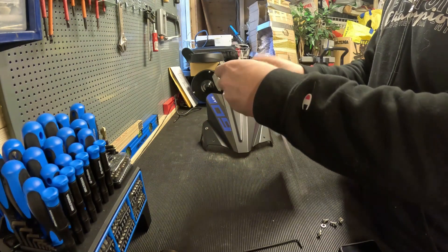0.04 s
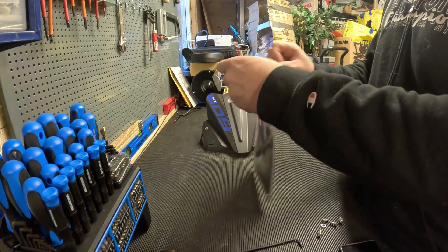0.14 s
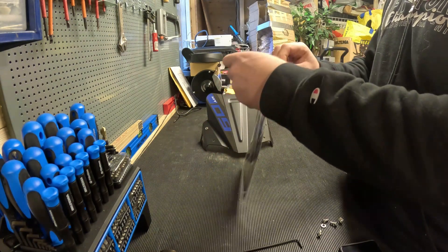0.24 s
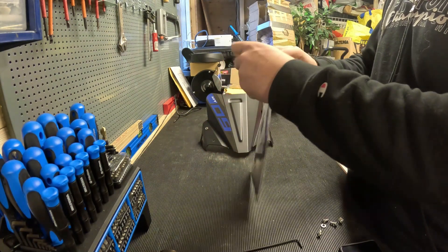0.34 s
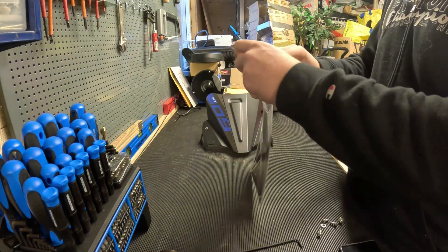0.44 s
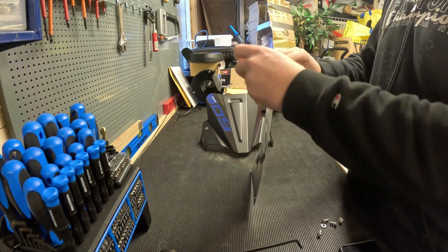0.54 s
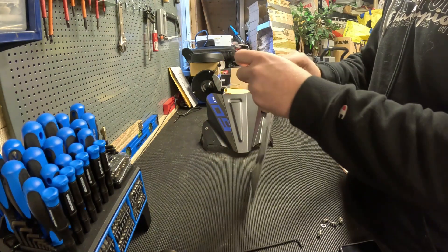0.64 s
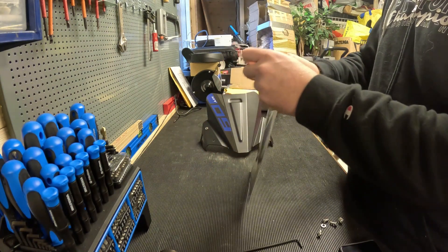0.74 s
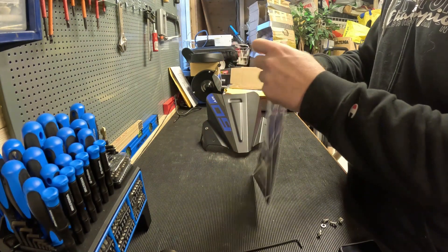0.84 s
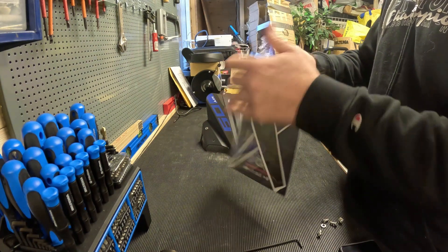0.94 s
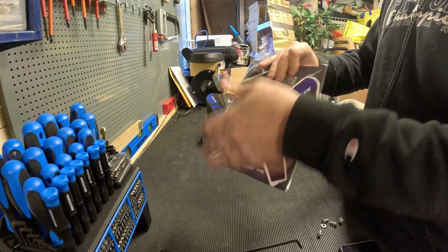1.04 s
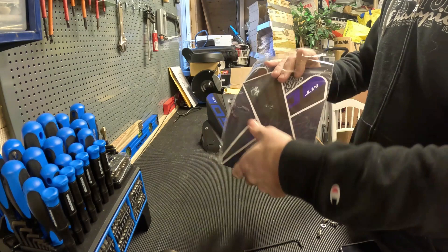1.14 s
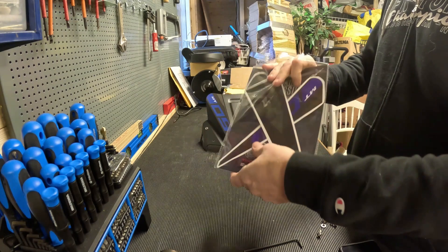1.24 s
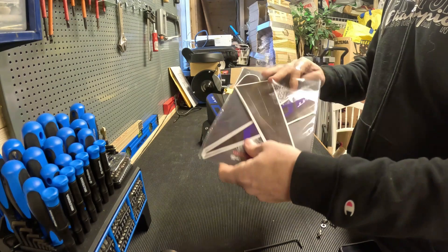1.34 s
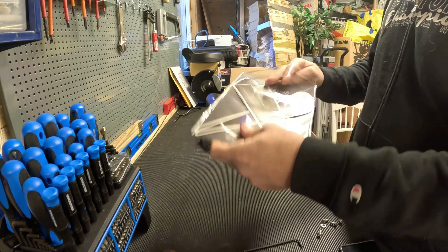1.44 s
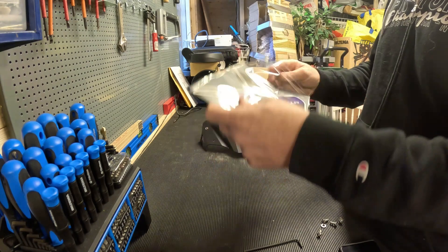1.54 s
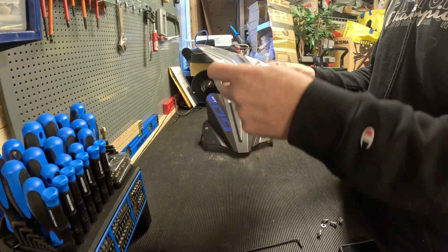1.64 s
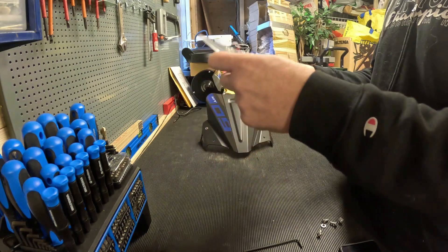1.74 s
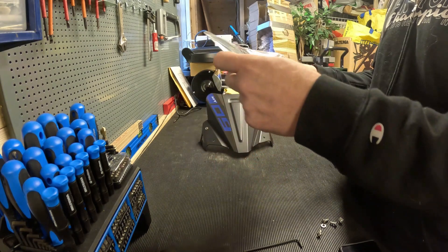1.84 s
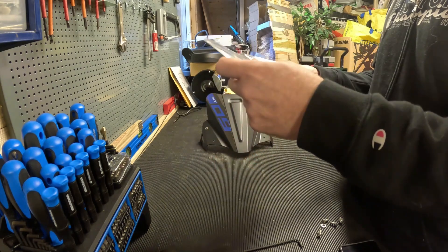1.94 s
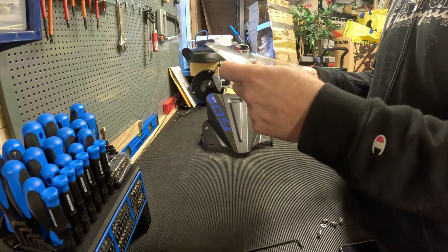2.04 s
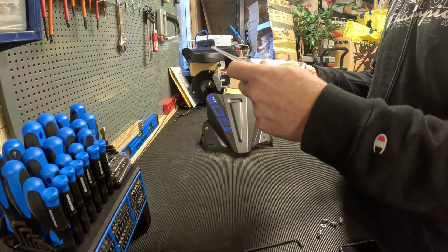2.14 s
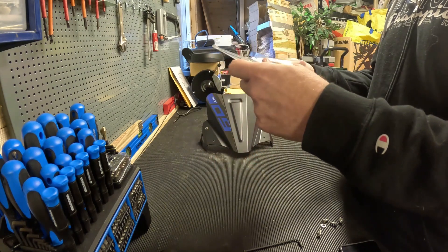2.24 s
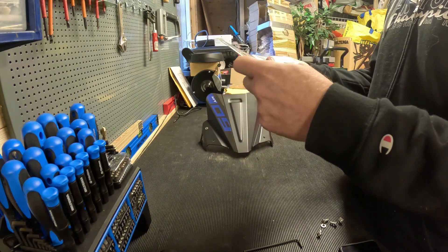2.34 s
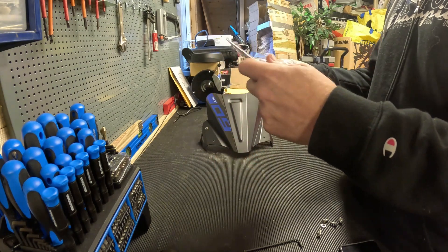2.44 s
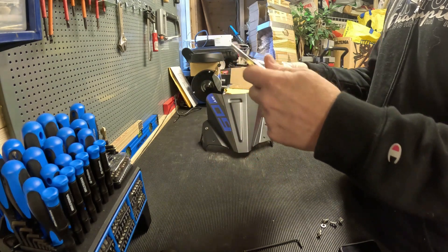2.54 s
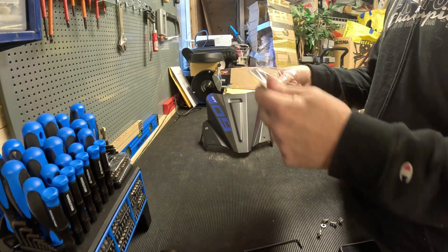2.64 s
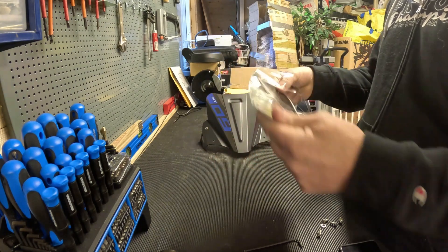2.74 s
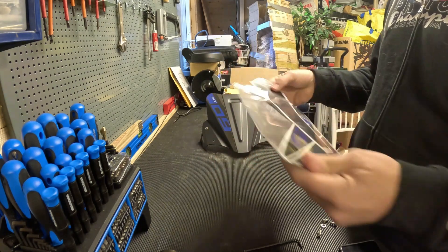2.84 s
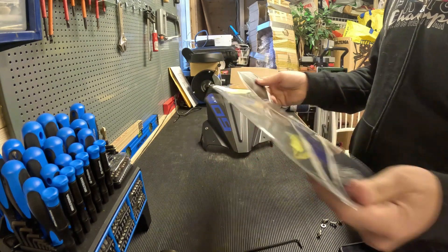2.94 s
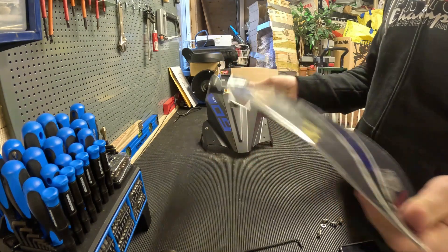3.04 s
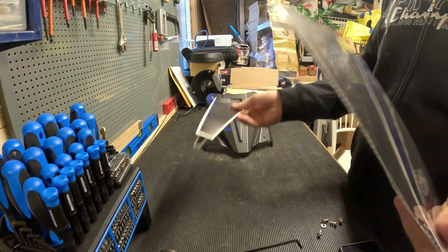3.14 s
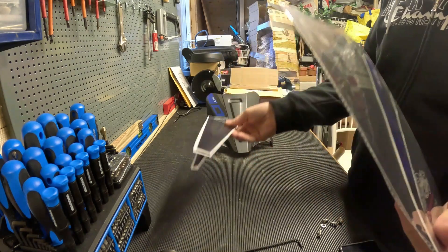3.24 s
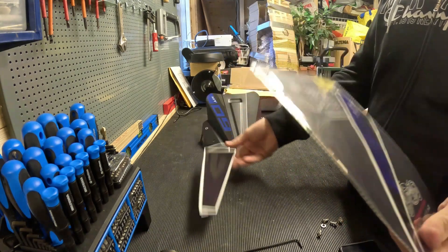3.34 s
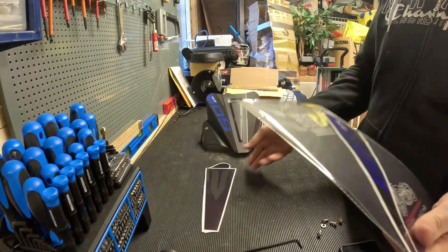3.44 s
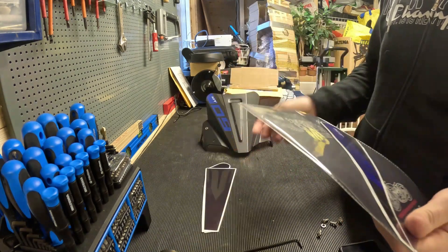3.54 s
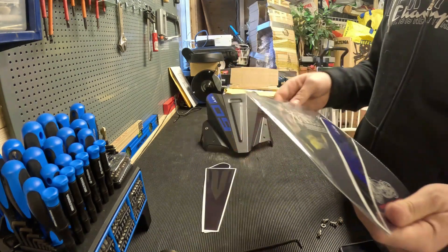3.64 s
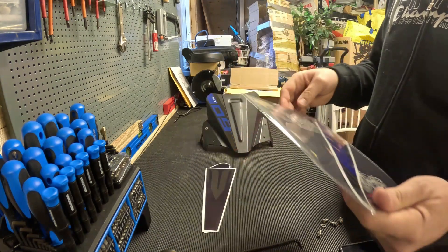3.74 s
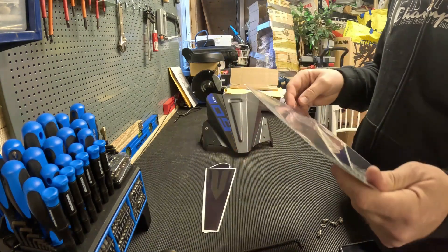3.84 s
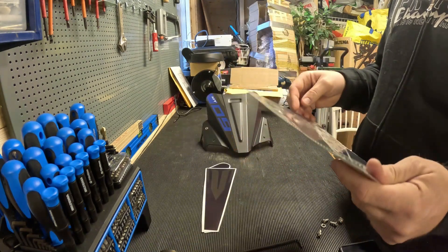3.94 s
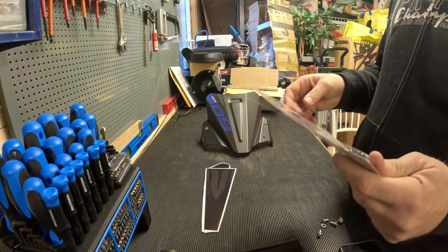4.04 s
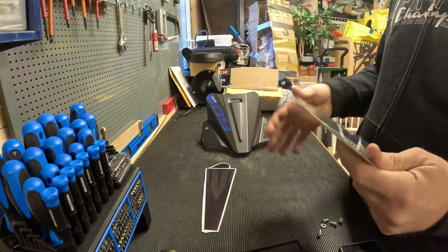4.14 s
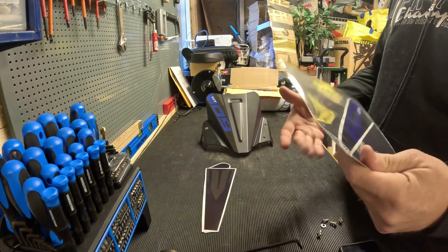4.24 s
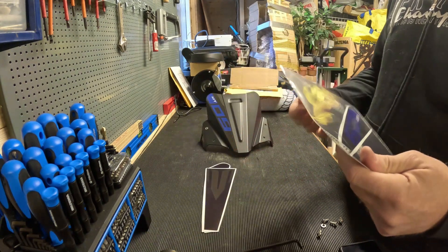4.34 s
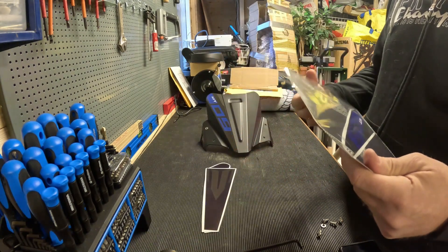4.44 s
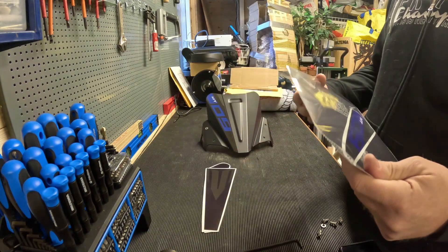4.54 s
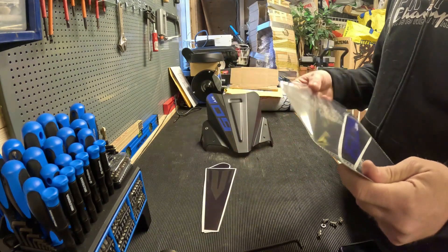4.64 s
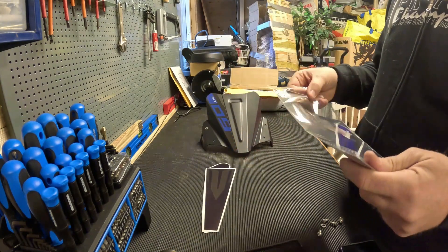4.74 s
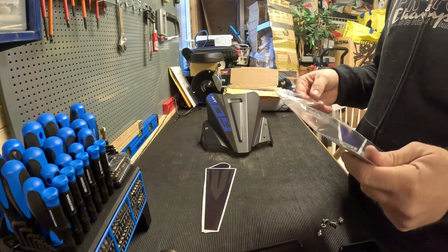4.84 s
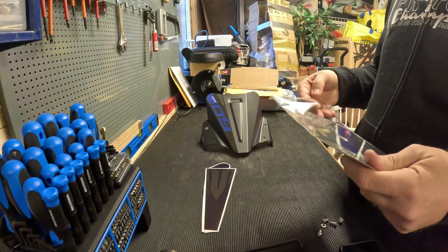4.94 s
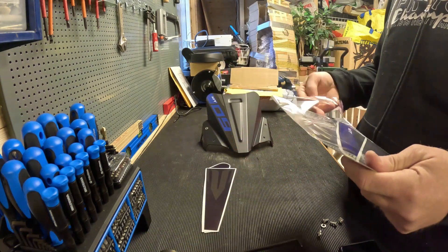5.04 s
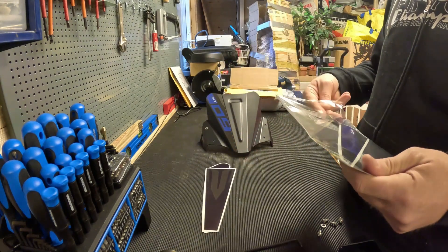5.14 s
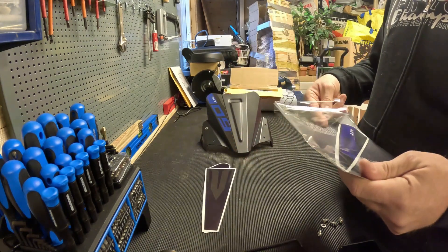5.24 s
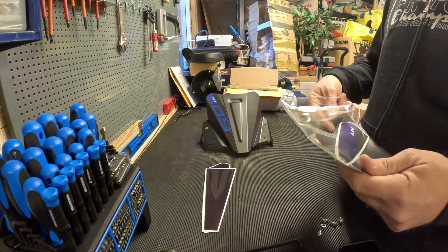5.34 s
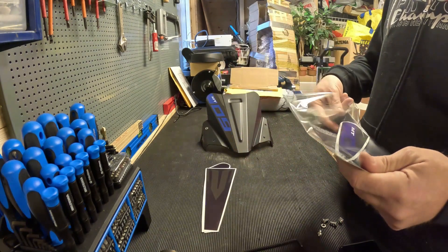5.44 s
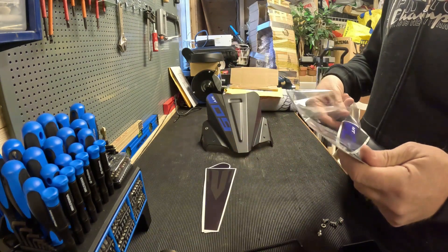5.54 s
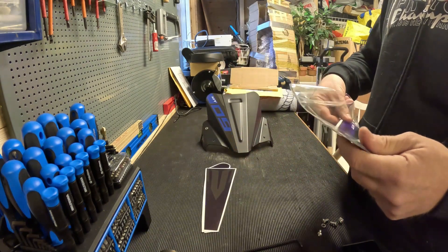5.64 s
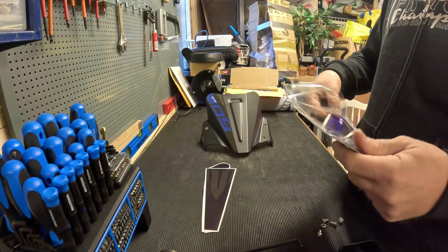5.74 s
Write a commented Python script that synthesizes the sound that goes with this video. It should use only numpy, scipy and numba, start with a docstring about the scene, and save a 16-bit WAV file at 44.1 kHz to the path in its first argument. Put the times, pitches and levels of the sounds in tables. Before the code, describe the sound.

Sharp crackly film creases and pops come in busy bursts, thin out midway, then return louder in a small cluttered workshop.

```python
"""A brief crackle and a crease snapping over open the scene: a glossy sticker sheet is bent, turned and
peeled in a workshop. Each snap is a burst of noise that swells, rings in its patch of film and rattles out.
Between snaps, flurries of tiny damped sines crackle as the hands grip; noise pushes ring as soft knocks.
A small cluttered room answers with short decaying noise, and a low rumble with faint hiss lies under all."""
import sys
import numpy as np
from scipy import signal
from scipy.fft import rfft, irfft
from scipy.io import wavfile
from scipy.ndimage import uniform_filter1d
from numba import njit

SR = 44100
rng = np.random.default_rng(int(sys.argv[2]) if len(sys.argv) > 2 else 0)


def store_wav(level_fs):
    """Save 16-bit WAV to argv[1]."""
    pcm = np.round(np.clip(np.atleast_2d(level_fs), -1, 1) * 32767)
    wavfile.write(sys.argv[1], SR, pcm.T.astype(np.int16))


N = 254898
T = np.arange(N) / SR  # time, s
HZ = np.maximum(np.fft.rfftfreq(N, 1 / SR), 1)  # frequency bins, kept above zero for the log axis

# spectrum of the rumble: pitch_hz, relative_density_db
RUMBLE_SPECTRUM = [(15, -17), (25, -6), (101, -6), (139, -18), (176, -5), (257, -22.5), (318, -30),
                   (404, -35.5), (655, -36.5), (1390, -68), (1720, -74), (6200, -38), (15000, -61)]
# slow course of the rumble: time_s, relative_level_db
RUMBLE_LEVEL = [(0.0, -63), (0.72, -59), (0.85, -66), (1.21, -59), (1.33, -65), (2.04, -57), (2.27, -62),
                (3.27, -61), (4.06, -65), (4.47, -60), (5.78, -63)]
# likeness of left and right in diffuse sound: pitch_hz, correlation (no unit)
LIKENESS = [(100, 1), (500, 0.71), (2000, 0.32), (8000, 0.42), (13000, .3)]
ROOM_DB, ROOM_T60_S, ROOM_TREBLE_T60_S = -13.5, 0.31, 0.072
# soft knocks and flaps of the whole sheet: start_s, relative_level_db, pitch_hz, push_t60_s
KNOCKS = [(0.305, -47.5, 196, 0.3), (0.568, -42.5, 150, 0.12), (0.573, -41, 427, 0.041),
          (.747, -38.5, 260, 0.043), (.748, -36, 532, 0.023), (0.851, -45, 73.4, 0.088),
          (0.998, -45, 221, 0.46), (1.102, -46, 111, 0.09), (1.148, -48.5, 198, 0.37),
          (1.28, -50, 86.1, 0.091), (1.463, -39.5, 171, 0.038), (1.826, -38, 161, 0.28),
          (1.966, -43, 186, 0.19), (2.227, -47.5, 200, .4), (2.451, -49, 181, 0.14),
          (2.561, -43.5, 176, 0.074), (2.616, -42, 163, 0.25), (3.037, -53.5, 83, 0.13),
          (3.309, -39, 188, .19), (3.312, -42.5, 329, 0.11), (3.753, -41.5, 91.5, 0.31),
          (3.745, -41.5, 193, 0.22), (4.306, -38.5, 149, 0.19), (4.367, -39.5, 185, 0.19),
          (4.426, -41, 164, 0.2), (5.033, -34.5, 177, .08), (5.093, -34, 178, .052),
          (5.181, -40.5, 170, 0.037), (5.327, -36.5, 210, .057), (5.705, -47.5, 154, 0.13)]
# low modes of the bench: pitch_hz, width_hz, level_db
BENCH_MODES = [(62, 18, -3), (88.6, 24, -2.5), (156, 27, 3.5), (205, 14, -21), (250, 106, -33),
               (397, 330, -11.5)]
# bouts of handling: start_s, length_s, relative_crackle_level_db at the start, rasp_against_crackle_db
BOUTS = [(-.02, 0.056, -42.5, -5), (0.198, 0.24, -54.5, 0.5), (0.546, 0.088, -54.5, -4),
         (0.683, 0.23, -40, -8), (0.92, 0.06, -54, -27), (1.018, 0.086, -40.5, -8), (1.109, .17, -38, -7),
         (1.29, .17, -40.5, -7), (1.462, 0.3, -44, -9), (1.645, 0.32, -46.5, -4.5),
         (1.953, 0.073, -47.5, 0), (2.045, 0.18, -47, -1.5), (2.25, 0.09, -46.5, -1.5),
         (2.358, 0.16, -49, -12), (2.502, .09, -45.5, -13), (2.601, 0.12, -42.5, -13),
         (2.8, 0.078, -48.5, -7.5), (2.891, 0.046, -42, 1.5), (2.99, 0.093, -63.5, 5),
         (3.305, 0.069, -65, -2), (3.68, 0.048, -56, -6), (3.744, 0.19, -59, -16), (3.95, .1, -63, 0),
         (4.113, 0.062, -60, -2), (4.297, 0.15, -52, 0), (4.43, 0.16, -50, -5), (4.576, 0.099, -39, -6),
         (4.674, .165, -42, -10), (4.879, 0.26, -50, -1.5), (5.019, 0.21, -36, -8.5),
         (5.231, 0.16, -43.5, -4), (5.419, .03, -50.5, -19), (5.448, 0.2, -47, -5), (5.64, .1, -40, -6.5),
         (5.733, .1, -39, -11)]
# time constants of grip and release, slackening within a bout, relative level between bouts
GRIP_S, LET_GO_S, SAG_DB_PER_S, REST_DB = 0.0065, 0.013, 19.5, -78.5
# creases snapping: flip_s, relative_crest_db, pitch_hz, rise_ms, fall_ms (times to 1/e, floored in snaps)
SNAPS = [(0.0326, -35.5, 1710, 1.5, 2.9), (.043, -37.5, 7100, 0.54, 1.6), (0.2214, -38, 1590, 9, 5.5),
         (.255, -39, 1520, 0.35, 3.4), (0.276, -40.5, 3060, 1.4, 25), (0.3292, -35, 3400, .3, 9.4),
         (0.3639, -27.5, 1610, 4, 9.3), (0.412, -35.5, 5500, 0.46, 9.1), (0.4591, -28.5, 2750, 0.18, 1.9),
         (0.4719, -35, 1620, 4.3, 4.3), (0.482, -34, 5630, 1.4, 5.8), (0.5727, -18.5, 3580, .7, 8.7),
         (0.6073, -35, 3420, 16, 5.1), (0.6341, -26.5, 6960, 0.56, 10), (.656, -21, 3600, 2.5, 7),
         (.7123, -32.5, 3360, .3, 22), (0.7474, -23, 7550, 0.75, 7), (0.7748, -27.5, 5100, 2.1, 4.9),
         (0.7944, -29, 7540, .21, 2.8), (0.8388, -32, 2280, 16, 6.6), (0.8631, -29.5, 2250, 1.6, 12),
         (0.8725, -31, 3300, 3.7, 3.8), (.8847, -25.5, 3540, 1.4, 3.6), (.9284, -32, 3470, .3, 4),
         (0.967, -31, 1670, 0.24, 2.8), (1.0123, -18, 3560, 3.4, 3.1), (1.0289, -25.5, 6100, 0.23, 1.8),
         (1.0686, -22, 3550, 0.27, 0.39), (1.1423, -19.5, 2670, 0.4, 4.7), (1.163, -23.5, 2520, 9.2, 12.5),
         (1.181, -20, 2700, .2, 0.54), (1.2082, -24.5, 2870, 7.9, 10), (1.2287, -23, 2500, 23, 13),
         (1.2635, -26.5, 3080, 2.3, 1.2), (1.303, -31, 2660, 5.4, 2.6), (1.325, -24, 5000, 0.77, 4.6),
         (1.3659, -25.5, 3600, 0.53, 2.5), (1.452, -31.5, 4000, 16, 23), (1.4974, -35, 3700, 1.1, 4.7),
         (1.5232, -25, 3930, 4.6, 7.7), (1.5747, -32.5, 4220, 3.5, 5.4), (1.592, -37, 4740, 1.4, 4.7),
         (1.626, -33.5, 5330, 0.57, 2.3), (1.675, -33.5, 5040, 17, 9.3), (1.698, -32.5, 1510, 1.4, 4.4),
         (1.724, -34, 2110, 5.9, 19), (1.7749, -31.5, 1470, 6.3, 3.2), (1.7965, -32, 3030, 6.2, 5.8),
         (1.8156, -21.5, 2820, 0.6, 6.6), (1.8343, -22, 1590, 3.5, 15), (1.852, -26.5, 2700, 4.4, 14),
         (1.8956, -22.5, 3270, 2, 4.5), (1.9762, -32, 1480, 0.61, 7.1), (2.0106, -30.5, 2280, 26, 4.5),
         (2.0526, -28.5, 5230, .3, 6.9), (2.112, -38, 3600, .27, 1.8), (2.1236, -28.5, 1520, 1.5, 3.5),
         (2.1423, -34, 7050, 1.9, 13), (2.175, -36.5, 1440, 1.2, 4.7), (2.2417, -41, 1450, 1.1, 4.9),
         (2.253, -29.5, 1510, 0.59, 15), (2.2826, -27.5, 2380, 4.4, 14), (2.2921, -25, 3900, 5.1, 9),
         (2.352, -37, 1620, .5, 3.3), (2.4281, -29, 1610, 9.6, 10), (2.443, -27, 3000, 0.45, 1.8),
         (2.45, -22, 5930, 1.1, 9.1), (2.504, -21.5, 3040, .4, 4.3), (2.569, -33, 1480, 10, 5),
         (2.5795, -25, 1600, 18, 9.2), (2.621, -30.5, 1420, .9, 9.7), (2.6344, -28.5, 3320, 2.5, 6.4),
         (2.6592, -28.5, 4900, .4, 28), (2.7611, -32.5, 5040, 18, 26), (2.758, -30, 6000, .3, 1.4),
         (2.7709, -31, 5600, .3, 23), (2.877, -35.5, 5740, 24, 56), (2.9223, -31, 2140, 0.33, 9.7),
         (3.0068, -32, 2000, 2.8, 3.2), (3.0361, -45, 2530, 8.7, 9.7), (3.065, -44, 3250, 1.7, 1.8),
         (3.2288, -52, 6000, .3, 24), (3.2979, -41.5, 1710, 0.43, 1.1), (3.344, -28.5, 3800, 2, 9.4),
         (3.5175, -52, 1480, .3, 7.3), (3.5326, -35.5, 1710, 0.42, 3.6), (3.5726, -55, 6800, 0.3, 9),
         (3.6244, -54.5, 6800, 1.1, 19), (3.685, -44, 4930, .3, 2.5), (3.7111, -40.5, 2330, .3, 3.4),
         (3.728, -28, 4200, 0.16, 2.5), (3.75, -36.5, 1500, 8.2, 3.5), (3.777, -39.5, 2980, 4.1, 2),
         (3.8532, -39, 1480, 0.77, 11), (3.8894, -41.5, 3080, 0.76, 3.1), (3.984, -40, 1830, 6.9, 22),
         (4.0057, -33, 4430, 0.47, 3.3), (4.1032, -46.5, 1540, .3, 19), (4.1251, -33.5, 3560, 1.3, 1.8),
         (4.1648, -40.5, 1950, .9, 4.3), (4.291, -28.5, 5500, 2.1, 5.2), (4.317, -20, 5340, 4.2, 4.2),
         (4.335, -24, 1470, 23, 4.4), (4.4327, -30, 1380, 2.7, 4.7), (4.4549, -26.5, 2650, 0.17, 3.2),
         (4.519, -48, 6800, .3, 1.2), (4.5309, -27.5, 4400, .2, 2.2), (4.545, -26, 3300, 0.39, 0.62),
         (4.591, -20.5, 2550, 1.5, 4.1), (4.6329, -23, 2100, 0.65, 2.1), (4.659, -27.5, 2790, 0.47, 0.6),
         (4.684, -27, 6350, 4.5, 7), (4.701, -22, 3080, 4.2, 2.4), (4.7102, -20, 5140, 0.32, 3.9),
         (4.7558, -21.5, 5330, .3, 5.1), (4.8183, -28.5, 4300, 2.9, 8.6), (4.8487, -35.5, 3380, .3, 2.1),
         (4.884, -38, 2530, .38, 2.5), (4.916, -51, 6100, 0.48, 0.89), (4.9652, -34.5, 3260, 0.68, 5.7),
         (4.978, -30.5, 2900, .65, 8.3), (4.989, -21.5, 3300, 0.24, 10.4), (5.0522, -19.5, 5500, 0.3, 6.1),
         (5.1033, -24, 4030, 24, 8.7), (5.1536, -17, 6140, 0.2, 6.8), (5.1837, -15.5, 2270, 0.68, 4.3),
         (5.2304, -16, 2620, 1.4, 3.4), (5.295, -17.5, 1470, 2, 2.8), (5.3331, -20, 2490, 1.6, 9.4),
         (5.36, -23.5, 3430, 0.27, 4.2), (5.42, -44, 5000, .3, 1.5), (5.4515, -24, 4700, .2, 0.71),
         (5.4672, -33, 5560, 9.7, 7.2), (5.4786, -31, 3440, 0.41, 18), (5.5258, -28, 1330, .76, 4),
         (5.629, -27.5, 4130, .2, 2.4), (5.6558, -47, 2440, 1.8, 5.4), (5.6892, -22, 3520, 0.46, 6.7),
         (5.7187, -28, 5300, 8, 11)]
# mean tone of the snaps as the sheet is turned: time_s, body_db, edge_db (both against the core)
SNAP_TONE = [(0, -6, -8), (.5, -15, -5.5), (.78, -8, -1), (.95, -16.5, -7.5), (1.2, -17, -7),
             (1.8, -10.5, -7), (2.05, -21, -10.5), (2.27, -16.5, -4.5), (2.45, -19, -2), (2.58, -16, -10),
             (2.75, -22.5, -1.5), (2.95, -12.5, -7.5), (3.3, -17, -7), (3.7, -24.5, -3.5), (4.35, -9, -5.5),
             (4.55, -17.5, -4.5), (4.95, -14.5, -5), (5.3, -15, -8.5), (5.78, -20, -12)]
# long snaps are fuller, high ones brighter; both tones scatter
BODY_DB_PER_DOUBLING, EDGE_DB_PER_OCTAVE, TONE_SCATTER_DB = 1.5, 2.5, 2.5
# resonances of the film and the camera shell: pitch_hz, width_hz, level_db
FILM_MODES = [(1014, 21, 0.5), (1504, 87, -16.5), (3230, 1000, -8.5), (5060, 2430, -10), (10000, 510, -5.5)]
# overall colour of the film sound: pitch_hz, gain_db
COLOUR = [(100, 4.5), (300, 1), (820, -3.5), (1300, 3), (2000, -1.5), (4000, -1.5), (7000, 2.5),
          (11000, -7), (13500, -10), (15500, -24)]
# level difference of the two ports: pitch_hz, left_minus_right_db
PORT_LEVEL = [(100, -0.6), (500, -1.4), (5000, -0.5), (9000, 0.5), (12000, 4), (15000, 1)]
# phase difference of the two ports: pitch_hz, left_lead_rad
PORT_PHASE = [(500, 0.079), (1800, -0.43), (3500, -0.78), (5600, -0.49), (10900, 0.04), (12000, 1),
              (14000, 0.72)]
TOP_HZ = 15700  # upper limit of the camera
OPPOSED = np.array([[1], [-1]])  # signs for left and right


def undb(db):
    """A level in dB is twenty times the logarithm of the amplitude ratio returned here."""
    return 10 ** (np.asarray(db) / 20)


def unit(x):
    """Division by the root mean square gives unit rms."""
    return x / np.sqrt(np.mean(x ** 2))


def crest(x):
    """Short-time power sets the scale: the loudest 2 ms get rms 1."""
    power = uniform_filter1d(np.mean(x ** 2, axis=0), SR // 500)
    return x / np.sqrt(power.max())


def over_hz(table):
    """A frequency response is interpolated along logarithmic frequency."""
    hz, value = np.transpose(table)
    return np.interp(np.log(HZ), np.log(hz), value)


def ring(x, hz, width):
    """A single resonance passes its centre at gain 1; its bandwidth sets the decay."""
    return signal.lfilter(*signal.iirpeak(hz, hz / width, SR), x)


def lowpass(order, hz):
    """A Butterworth low-pass is maximally flat below its corner."""
    return signal.butter(order, hz, fs=SR, output="sos")


def band(x, lo_hz, hi_hz):
    """A gentle band-pass keeps the spectrum between two corners."""
    return signal.sosfilt(signal.butter(2, [lo_hz, hi_hz], "band", fs=SR, output="sos"), x)


def walk(rate):
    """Random levels, held for 1 / rate s and averaged twice, drift smoothly with a spread near 1."""
    k = int(SR / rate)
    held = np.repeat(rng.standard_normal(N // k + 1), k)
    return 1.3 * uniform_filter1d(uniform_filter1d(held, k), k)[:N]


def pair(shape_db):
    """A shared and an opposed noise, mixed by frequency, give two channels of the stated correlation."""
    like = np.clip(over_hz(LIKENESS), 0, 1)
    mid, side = rfft(rng.standard_normal((2, N))) * undb(shape_db)
    return irfft(np.sqrt(1 + like) * mid + np.sqrt(1 - like) * side * OPPOSED, N)


def rumble():
    """Broadband noise weighted to low frequency rumbles; its three bands fluctuate independently."""
    noise = unit(pair(over_hz(RUMBLE_SPECTRUM)))
    under_75 = signal.sosfiltfilt(lowpass(2, 75), noise)
    under_140 = signal.sosfiltfilt(lowpass(2, 140), noise)
    bands = (under_75, under_140 - under_75, noise - under_140)
    wavering = sum(part * undb(2.5 * np.clip(walk(9), -2, 1.5)) for part in bands)
    return wavering * undb(np.interp(T, *np.transpose(RUMBLE_LEVEL)) + 5.0)


def room(x):
    """Dense echoes off shelves and pegboard decay exponentially; absorption ends the treble sooner."""
    t = T[:SR // 2]
    echo = pair(0)[:, :SR // 2] * (t > .003)  # the first reflection comes after 3 ms
    bass = signal.sosfilt(lowpass(1, 1500), echo)
    tail = bass * np.exp(-t * np.log(1000) / ROOM_T60_S)
    tail = tail + (echo - bass) * np.exp(-t * np.log(1000) / ROOM_TREBLE_T60_S)
    tail = tail / np.sqrt(np.sum(tail ** 2) / 2)  # unit mean energy per channel
    return undb(ROOM_DB) * signal.fftconvolve(tail, x.mean(axis=0)[None], axes=1)[:, :N]


def knocks():
    """Forced resonance: a soft, fumbling push excites the flap's own pitch and the bench modes."""
    span = SR // 3
    out, t = np.zeros(N + span), T[:span]
    for start_s, level_db, hz, t60_s in KNOCKS:
        decay = np.exp(-t * np.log(1000) / max(t60_s, .02))
        push = rng.standard_normal(span) * (1 - np.exp(-t / 0.0038)) * decay
        flap = ring(ring(push, hz, 76.0), hz, 76.0)
        bench = sum(undb(db) * ring(push, f, width) for f, width, db in BENCH_MODES)
        thud = 1.3 * flap + bench
        i = int(start_s * SR)
        out[i:i + span] += undb(level_db + 5.0) * thud / np.abs(thud).max()
    return out[:N]


@njit
def grains(start, pole, left, right, length):
    """Damped free vibration: a rotating, shrinking phasor gives each grain a few cycles of sine."""
    out = np.zeros((2, length))
    for k in range(len(start)):
        z, i = 1. + 0j, start[k]
        while i < length and abs(z) > .005:
            out[0, i] += left[k] * z.imag
            out[1, i] += right[k] * z.imag
            z *= pole[k]
            i += 1
    return out


def crackle(hz, octaves, cycles, scatter_db, pan_db, count):
    """Independent tiny creases at random moments, pitches, sizes and places add up to crackle."""
    when, pitch = rng.random(count), rng.standard_normal(count)
    size, place = rng.exponential(1, count), rng.standard_normal(count)
    f = np.clip(hz * 2 ** (octaves * pitch), 50, .4 * SR)
    pole = np.exp((2j * np.pi - 1 / cycles) * f / SR)  # falls to 1/e in the given cycles
    gain = undb(scatter_db * np.minimum(size, 4)) * np.sign(place)
    gain = gain * np.sqrt(f / hz)  # short high grains carry equal energy
    left, right = gain * undb(pan_db * place / 2), gain * undb(-pan_db * place / 2)
    return unit(grains((when * N).astype(np.int64), pole, left, right, N))


def bouts():
    """Crackle follows the strain: each bout grips quickly, slackens slowly and lets go."""
    gain, rasp = undb(REST_DB), undb(REST_DB)
    for start_s, length_s, level_db, rasp_db in BOUTS:
        since = T - start_s
        grip = np.clip(since / GRIP_S, 0, 1) * np.exp(-np.maximum(since - length_s, 0) / LET_GO_S)
        grip = grip * undb(level_db - SAG_DB_PER_S * np.clip(since, 0, length_s))
        gain, rasp = gain + grip, rasp + grip * undb(rasp_db)
    return gain, rasp


def rustle():
    """Amplitude modulation: three grain sizes follow the hands and come in small flurries."""
    gain, rasp = bouts()
    low = crackle(hz=1460, octaves=0.47, cycles=1.72, scatter_db=2.0, pan_db=3.5, count=4000)
    mid = crackle(hz=3256, octaves=0.462, cycles=3.9, scatter_db=3.0, pan_db=4.5, count=9000)
    high = crackle(hz=8820, octaves=0.622, cycles=4.2, scatter_db=3.0, pan_db=4.0, count=18000)
    flurry_db = np.minimum(1.5 * walk(40) + 2.05 * walk(140), 5.0)
    return undb(flurry_db) * (rasp * low + gain * (mid + undb(-3) * high))


def snaps():
    """Buckling: a crease creaks up to the flip, the film around it rings, then rattles out."""
    turn_s, bodies_db, edges_db = np.transpose(SNAP_TONE)
    lead, span = 2048, 6144  # samples before the flip, and in all
    out, t_ms = np.zeros((2, N + span)), (np.arange(span) - lead) / SR * 1000
    for flip_s, crest_db, hz, rise_ms, fall_ms in SNAPS:
        after = np.maximum(t_ms, 0) / max(fall_ms, .5)
        fall = 0.85 * np.exp(-after) + 0.068 * np.exp(-after / 8.3)
        rattle = np.where(t_ms < 0, np.exp(t_ms / max(rise_ms, .2)), fall)
        shared, slips = rng.standard_normal((2, span))
        apart = rng.standard_normal((2, span))
        lean, body_luck, edge_luck = rng.standard_normal(3)
        grit = undb(3.74 * uniform_filter1d(slips, 40) * np.sqrt(40))  # slips come unevenly
        # the two ports hear slightly different parts of the patch
        jolt = (shared + 0.3 * apart) * rattle * grit
        # large, low patches ring more
        patch = (3800 / hz) ** 0.99 * ring(jolt, hz, 0.14 * hz)
        core = (hz / 3000) ** 0.35 * band(jolt, 933, 6820) + patch
        body = band(jolt, 370, 1094)
        edge = band(jolt + 0.43 * apart * rattle, 5400, 12450)
        body_db = np.interp(flip_s, turn_s, bodies_db) + TONE_SCATTER_DB * body_luck
        body_db += BODY_DB_PER_DOUBLING * np.log2((rise_ms + fall_ms) / 6)
        edge_db = np.interp(flip_s, turn_s, edges_db) + TONE_SCATTER_DB * edge_luck
        edge_db += EDGE_DB_PER_OCTAVE * np.log2(hz / 3500)
        snap = crest(core) + undb(body_db) * crest(body) + undb(edge_db) * crest(edge)
        i = int(flip_s * SR)
        out[:, i:i + span] += undb(crest_db + 0.89 * lean * OPPOSED) * snap
    return out[:, lead:lead + N]


def scene():
    """Superposition: the resonant film and the knocks sound directly and in the room, over the rumble."""
    film = snaps() + rustle()
    film = 0.69 * film + sum(undb(db) * ring(film, hz, width) for hz, width, db in FILM_MODES)
    near = irfft(rfft(film) * undb(over_hz(COLOUR)), N) + knocks()
    return near + room(near) + rumble()


def record(dry):
    """Interaural-like cues: the ports differ in level and phase by frequency; the camera cuts the top."""
    half = 0.5 * OPPOSED  # each port takes half of the difference
    shift = np.exp(1j * half * over_hz(PORT_PHASE))
    ports = irfft(rfft(dry) * undb(half * over_hz(PORT_LEVEL)) * shift, N)
    return signal.sosfilt(signal.ellip(10, .2, 80, TOP_HZ, fs=SR, output="sos"), ports)


dry = scene()
out = record(dry)
store_wav(out)
```